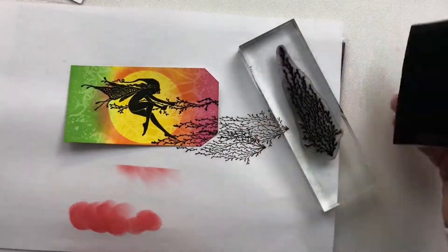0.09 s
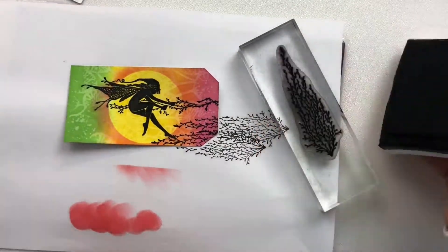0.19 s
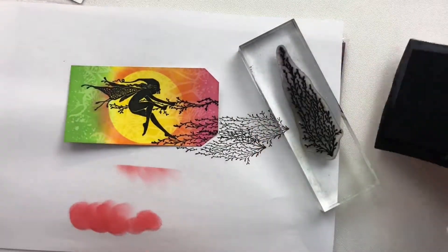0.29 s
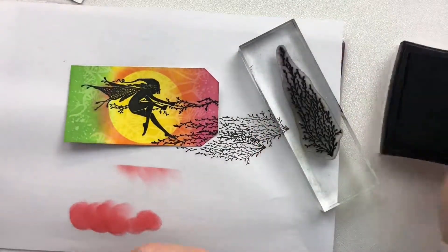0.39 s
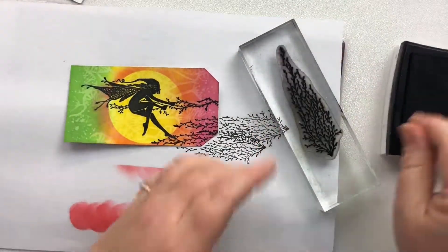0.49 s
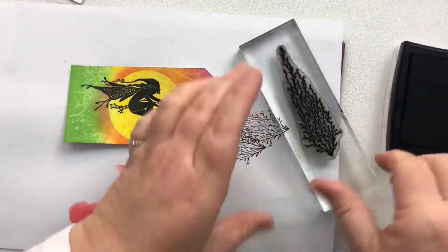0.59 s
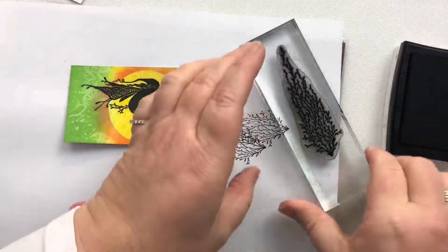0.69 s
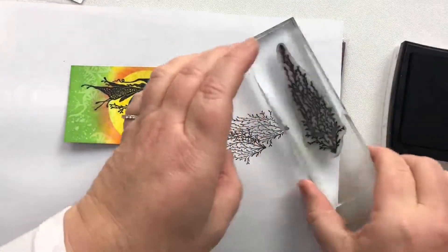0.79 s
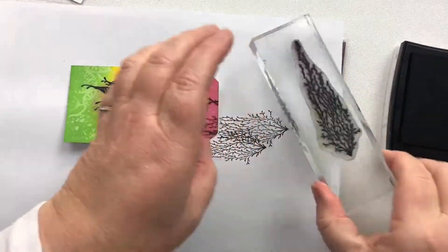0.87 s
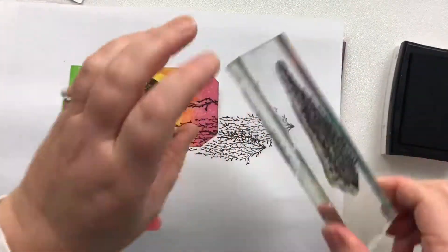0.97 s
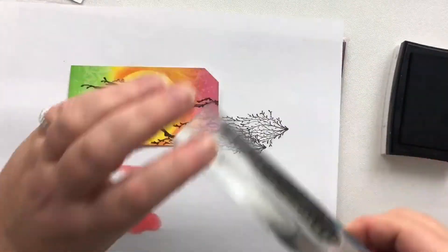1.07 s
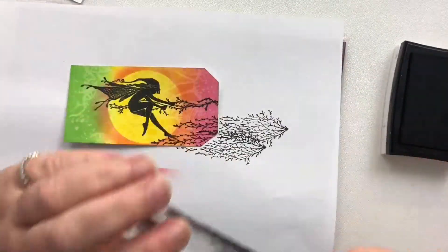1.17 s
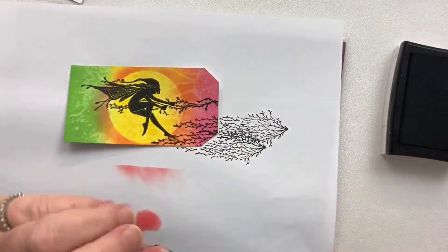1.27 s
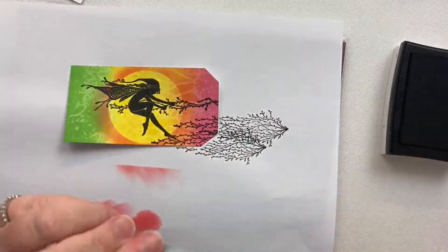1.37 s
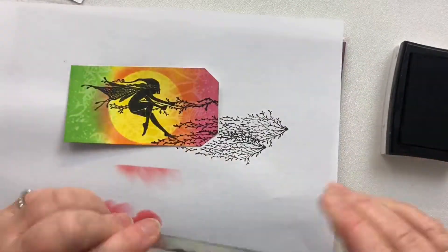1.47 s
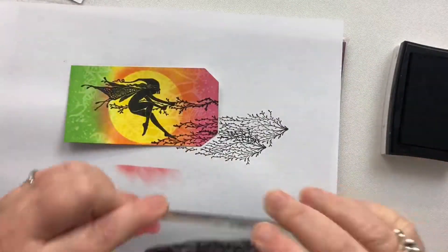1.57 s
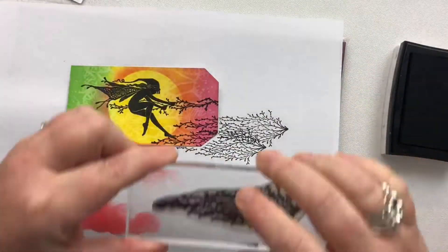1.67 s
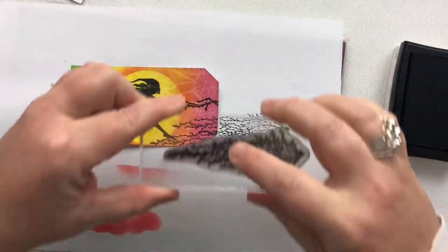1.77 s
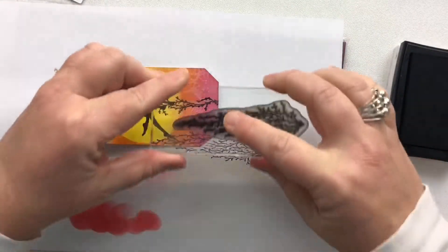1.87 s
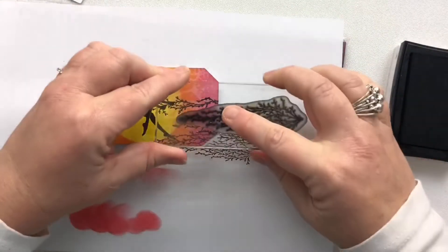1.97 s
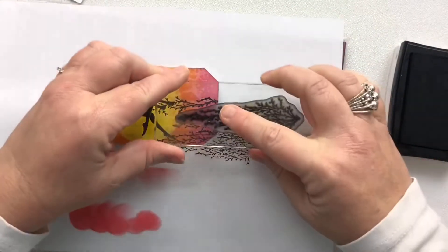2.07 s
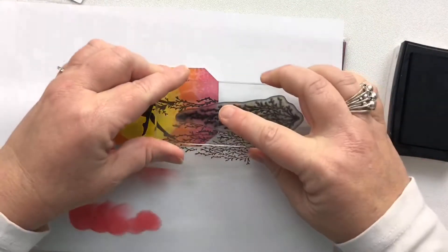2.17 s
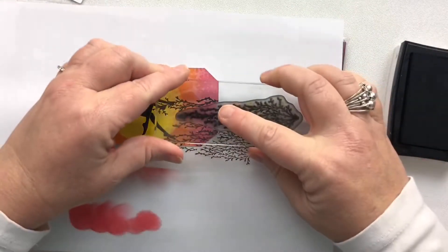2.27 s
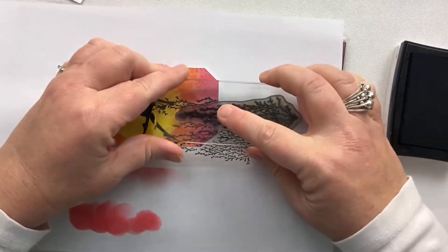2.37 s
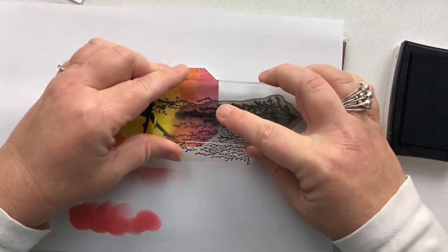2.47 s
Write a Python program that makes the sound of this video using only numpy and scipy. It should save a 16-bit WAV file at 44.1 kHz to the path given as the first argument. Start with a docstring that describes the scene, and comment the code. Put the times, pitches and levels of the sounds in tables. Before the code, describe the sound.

Close up in a small room with a low hum, a plastic ink pad and its lid land with hollow, bouncing knocks. A grainy paper scuff follows, then two sharp clicks from a stamp block and faint rubs.

```python
"""Close by, in a small room with a faint mains hum, a plastic ink pad drags briefly on a craft desk,
lands and rocks to rest, each knock ringing its shell and thudding in the desk top.
Its lid clatters down beside it. A hand scuffs over the paper with a grainy hiss,
then a clear stamp block is picked up with two sharp clicks, the second with a soft bump.
Last, the block is pressed softly onto a card, amid faint rubs and ticks."""
import sys
import numpy as np
from scipy import signal
from scipy.fft import irfft
from scipy.io import wavfile

SR = 44100
rng = np.random.default_rng(int(sys.argv[2]) if len(sys.argv) > 2 else 0)


def generate_wav(sig):
    """Save sig (samples, or channels by samples) to the path in sys.argv[1] as 16-bit PCM at SR."""
    pcm = np.round(np.clip(np.atleast_2d(sig).T, -1, 1) * 32767).astype(np.int16)
    wavfile.write(sys.argv[1], SR, pcm)


N = 110250
T = np.arange(N) / SR


def amp(db):
    """Decibels to gain."""
    return 10 ** (np.asarray(db) / 20)


def at_hz(points, hz):
    """Read a curve on a log-frequency axis."""
    freqs, values = np.transpose(points)
    return np.interp(np.log(hz), np.log(freqs), values)


def add(out, start_s, sound):
    """Mix a sound in at its cue."""
    i = max(int(start_s * SR), 0)
    out[i:i + len(sound)] += sound[:N - i]


def noise(colour, tilt_db=0, size=32768):
    """Unit-rms noise shaped by an EQ curve, tilted by tilt_db per octave about 2 kHz."""
    hz = np.maximum(np.arange(size // 2 + 1) * SR / size, 1)
    gain = amp(at_hz(colour, hz) + tilt_db * np.log2(np.maximum(hz, 300) / 2000))
    hiss = irfft(gain * np.exp(2j * np.pi * rng.random(len(hz))), size)
    return hiss / np.sqrt(np.mean(hiss ** 2) + 1e-20)


def wander(rate, t):
    """Random modulation, gliding to `rate` new values a second."""
    return np.interp(t * rate, np.arange(4096), rng.standard_normal(4096))


def decay(t, t60):
    """Exponential envelope, down 60 dB at t60."""
    return np.exp(-np.log(1000) * t / t60)


def ring(modes, tilt_db=0, polarity=-1):
    """Struck modes, the kth weighted by polarity ** k: at -1, neighbours swing opposite ways."""
    t, out = T[:SR // 2], 0
    for k, (hz, db, t60) in enumerate(modes):
        gain = polarity ** k * amp(db + tilt_db * np.log2(hz / 2000))
        out = out + gain * np.sin(2 * np.pi * hz * t) * decay(t, t60)
    return out


# Partials of the hum: (frequency [Hz], rms level [dB])
HUM_PARTIALS = [(48.8, -55), (199, -79), (245, -81.5), (299.5, -74), (398.5, -80.5), (500, -81)]
# EQ of the room's air, mostly rumble: (frequency [Hz], relative level [dB per Hz])
AIR_EQ = [(12, 31), (28, 9.5), (50, 15), (80, 4), (160, -6), (330, -7), (700, -14.5), (1500, -21),
          (6000, -24.5), (15000, -26.5)]

def room_tone(waver=0.081, air_db=-48.5):
    """The bed: room air and a mains hum that wavers in level and phase."""
    hum = 0
    for hz, db in HUM_PARTIALS:
        swell = 1 + waver * wander(9, T)
        phase = 2 * np.pi * (hz * T + rng.random()) + waver * wander(7, T)
        hum = hum + amp(db) * np.sqrt(2) * swell * np.sin(phase)
    return hum + amp(air_db) * noise(AIR_EQ, size=N)


# Reverb time of the small room: (frequency [Hz], t60 [s])
ROOM_DECAY = [(150, .26), (500, .22), (1000, .23), (2000, .27), (6000, .26), (14000, .21)]

def room_tail(wash, build_s=0.0051):
    """Reflections build up quickly, then each octave dies at its own rate."""
    t, tail, rest = T[:len(wash)], 0, wash
    for hz in 250 * 2. ** np.arange(7):
        band = signal.sosfiltfilt(signal.butter(2, hz, fs=SR, output="sos"), rest)
        tail = tail + band * decay(t, at_hz(ROOM_DECAY, hz / np.sqrt(2)))
        rest = rest - band
    return tail * (1 - np.exp(-t / build_s))


def mode_cluster(colour, tilt_db, t60, room_db):
    """A crowd of short-lived, overlapping modes, played as a noise burst with a room tail."""
    direct = noise(colour, tilt_db)
    tail = room_tail(noise(colour, tilt_db))
    return direct * decay(T[:len(direct)], t60) + amp(room_db) * tail


# Small ticks and bumps; the sharp cluster at 0.88 s is the block's first click:
# (time [s], level [dB], centre [Hz], half-width [fraction of centre], t60 [s], reverb send [dB])
TICK_CUES = [(0.030, -51.5, 6347, 0.18, 0.02, -16.5), (0.073, -44, 1680, 0.33, 0.0073, -20),
             (0.1083, -45, 4750, 0.38, 0.024, -24), (0.352, -39, 203, 0.082, .08, -30),
             (0.394, -38, 201, .08, 0.24, -40), (0.5612, -21, 11900, 0.066, 0.0025, -54),
             (0.581, -33.5, 11800, .25, 0.016, -53), (0.585, -24, 1500, 1, 0.004, -53),
             (0.667, -50.5, 230, 0.28, 0.068, -17.5), (0.701, -41.5, 178, 0.69, 0.033, -10.5),
             (0.8809, -42, 2270, 0.65, 0.019, -16.5), (0.881, -27.5, 7400, 0.17, 0.0092, -31.5),
             (0.8882, -37.5, 11200, 1, 0.0095, -21.5), (1.398, -54.5, 1470, 0.29, 0.01, -20.5),
             (1.401, -55, 175.4, 0.27, .04, -23.5), (1.46, -59, 4495, .6, 0.0078, -24),
             (1.566, -57, 13030, 0.11, 0.033, -2.5), (1.912, -53, 6200, 0.11, 0.013, -23),
             (2.1023, -51.5, 2590, 0.42, 0.0079, -23.5), (2.103, -48.5, 750, 0.35, 0.023, -15),
             (2.275, -60.5, 4000, 1, 0.012, -17)]

def ticks(attack_s=0.0001):
    """Light contacts of plastic, nails and card, each exciting one resonance."""
    out, hz = np.zeros(N), np.geomspace(40, 18000, 120)
    for start_s, db, centre_hz, width, t60, room_db in TICK_CUES:
        detune = (hz / centre_hz - centre_hz / hz) / (2 * width)
        bell_eq = np.c_[hz, -20 * np.log10(1 + detune ** 2)]
        tick = mode_cluster(bell_eq, 0, t60, room_db)
        attack = 1 - np.exp(-T[:len(tick)] / attack_s)
        add(out, start_s, amp(db) * tick * attack)
    return out


def rub(colour, tilt_db, length_s, fade_s, grain_db=3, grains_per_s=120):
    """One stroke of friction: hiss with a grainy level, fading in and out."""
    hiss = noise(colour, tilt_db)[:int(length_s * SR)]
    t = T[:len(hiss)]
    fade = np.sqrt(np.clip(np.minimum(t, length_s - t) / fade_s, 0, 1))
    return hiss * fade * amp(grain_db * wander(grains_per_s, t))


# Drags of the pad's case: (time [s], length [s], level [dB])
DRAG_CUES = [(0.111, 0.11, -56.5), (0.169, 0.024, -50)]
# Hollow EQ of plastic on the desk: (frequency [Hz], relative level [dB per Hz])
DRAG_EQ = [(150, -12), (500, 1), (740, 6.5), (1150, -10.5), (1550, 3), (1800, 3.5), (2300, -22),
           (3500, -16), (6200, -4.5), (8000, -18), (12500, -17), (16000, -22)]

def pad_drag():
    """The case rubs along the desk just before it lands."""
    out = np.zeros(N)
    for start_s, length_s, db in DRAG_CUES:
        add(out, start_s, amp(db) * rub(DRAG_EQ, 0, length_s, fade_s=0.002))
    return out


# Low body of the desk top: (frequency [Hz], relative level [dB], t60 [s])
DESK_MODES = [(122, -25, .07), (170, -20, .06), (188, -23, .2), (212, -14, .05), (244, -15, .1),
              (272, -20, .06), (392, -23, .09), (483, -12, .09), (554, -14, .08), (635, -14, .06)]

def desk_thud(low_cut_hz=202):
    """The desk top is pushed down as one, then rings; it radiates little deep bass."""
    low_cut = signal.butter(2, low_cut_hz, "high", fs=SR, output="sos")
    return signal.sosfilt(low_cut, ring(DESK_MODES, polarity=0.96))


def knocks(hits, shell_modes, shell_eq, cluster_db, room_db, contact_s=0.0005):
    """Each knock cracks at the point of contact, rings the plastic shell and thuds in the desk."""
    out = np.zeros(N)
    for start_s, thud_db, ring_db, tilt_db in hits:
        cluster = mode_cluster(shell_eq, tilt_db, t60=0.058, room_db=room_db)
        t = T[:len(cluster)]
        crack = amp(5) * noise(shell_eq, tilt_db) * decay(t, t60=0.024)
        attack = 1 - np.exp(-t / contact_s)
        add(out, start_s, amp(cluster_db + ring_db) * (cluster + crack) * attack)
        add(out, start_s, amp(ring_db) * ring(shell_modes, tilt_db))
        add(out, start_s, amp(thud_db) * desk_thud())
    return out


# Knocks of the case: (time [s], thud gain [dB], ring gain [dB], brightness [dB per octave])
PAD_HITS = [(0.2203, -11, -5.5, -3.5), (0.2226, -27.5, -4.5, 4), (0.2618, -4, -6, -0.3),
            (0.3102, -25.5, -14, -0.5), (0.3665, -33.5, -31, -1.5)]
# Strong modes of the case: (frequency [Hz], relative level [dB], t60 [s])
PAD_RING = [(705, -16, .11), (778, -18, .07), (850, -22, .06), (930, -27, .09), (1680, -31, .2),
            (1727, -33, .2), (2272, -35, .1), (2897, -32, .16), (4546, -24, .11), (4571, -29, .12),
            (5150, -33, .13), (5826, -28, .15), (6355, -26, .14), (6705, -28, .11)]
# EQ of its cluster of weaker modes: (frequency [Hz], relative level [dB per Hz])
PAD_EQ = [(120, -16), (350, -12), (680, 5), (1200, -1.5), (1750, 2), (2400, -7.5), (3500, -9.5),
          (5000, -4.5), (6400, -1), (8500, -12), (11200, -8), (14000, -15), (16000, -21)]

def pad_landing():
    """The ink pad's plastic case lands and rocks to rest."""
    return knocks(PAD_HITS, PAD_RING, PAD_EQ, cluster_db=-11, room_db=-8.5)


# Knocks of the lid: (time [s], thud gain [dB], ring gain [dB], brightness [dB per octave])
LID_HITS = [(0.4432, -7.5, -8, -4.8), (0.4482, -22, 0.5, -0.8), (0.4962, -9.5, -25, -12),
            (0.5262, -25.5, -47, 12), (0.5415, -15.5, -27, -6)]
# Strong modes of the lid: (frequency [Hz], relative level [dB], t60 [s])
LID_RING = [(483, -24, .11), (842, -19, .05), (1042, -17, .1), (1103, -20, .09), (1353, -24, .12),
            (2150, -27, .08), (4125, -11, .09), (4180, -17, .07), (4522, -25, .13), (5276, -16, .12),
            (5997, -20, .13), (6390, -22, .11), (11880, -28, .1), (12837, -29, .13)]
# EQ of its cluster of weaker modes: (frequency [Hz], relative level [dB per Hz])
LID_EQ = [(120, -23.5), (350, -3.5), (600, -1), (950, 2), (1500, -2.5), (2200, 0), (3200, -8), (4200, -0.5),
          (4800, -5), (6400, 0), (8500, -8), (10500, -12), (12200, -6), (14500, -12.5), (16000, -23.5)]

def lid_clatter():
    """The lid touches the desk, slaps down and bounces."""
    return knocks(LID_HITS, LID_RING, LID_EQ, cluster_db=-8, room_db=-10)


# Hand strokes: (time [s], length [s], level [dB], brightness [dB per octave])
SCUFF_CUES = [(0.564, 0.19, -58.5, 0), (0.746, 0.082, -56, 2.5), (0.819, 0.095, -65, 1.5),
              (0.921, 0.19, -68, 0), (1.072, 0.31, -70, -2), (1.371, 0.31, -75, 3), (1.59, 0.35, -69.5, -1),
              (2.16, 0.079, -71.5, -1.5)]
# EQ of skin on paper: (frequency [Hz], relative level [dB per Hz])
SCUFF_EQ = [(150, -11), (500, 2.5), (1000, -5), (1800, -2), (3100, 0), (4700, -4), (6700, 0.5),
            (9000, -13.5), (12700, -7.5), (16000, -21.5)]

def hand_scuffs():
    """Hands slide over paper in soft-edged strokes of friction."""
    out = np.zeros(N)
    for start_s, length_s, db, tilt_db in SCUFF_CUES:
        add(out, start_s, amp(db) * rub(SCUFF_EQ, tilt_db, length_s, fade_s=0.041))
    return out


# Tight, bright modes of the block's second click: (frequency [Hz], relative level [dB], t60 [s])
BLOCK_RING = [(131, -19, 0.044), (296, -17, 0.016), (740, -30, 0.02), (1898, -22.5, 0.018),
              (3315, -0.5, 0.0065), (4930, -2, 0.0034), (6720, 2, 0.0038)]

def block_snap(bump_hz=30.3, bump_db=-27.5, bump_t60_s=0.15):
    """The stamp block snaps free of the paper: a soft sub bump under one dry click."""
    out = np.zeros(N)
    high_cut = signal.butter(4, 8200, fs=SR, output="sos")
    add(out, 1.058, -ring([(bump_hz, bump_db, bump_t60_s)]))
    add(out, 1.0655, amp(-21.5) * signal.sosfilt(high_cut, ring(BLOCK_RING)))
    return out


def scene():
    """Impacts and friction over the room tone, in mono."""
    impacts = pad_landing() + lid_clatter() + ticks() + block_snap()
    friction = pad_drag() + hand_scuffs()
    return (impacts + friction + room_tone())[None]


def record(dry, ceiling=0.9, high_cut_hz=15750):
    """A soft clip rounds the loudest peaks and a steep filter cuts the top."""
    high_cut = signal.ellip(10, .2, 80, high_cut_hz, fs=SR, output="sos")
    return signal.sosfilt(high_cut, ceiling * np.tanh(dry / ceiling))


dry = scene()
out = record(dry)
generate_wav(out)
```